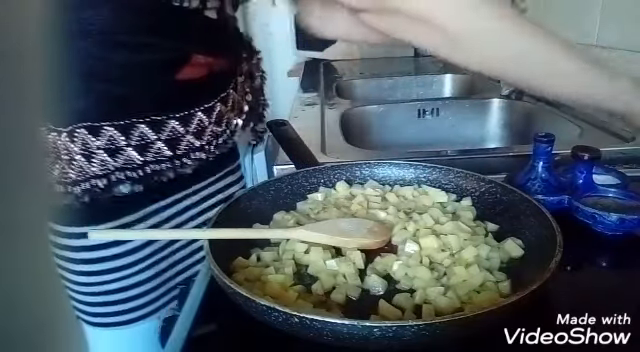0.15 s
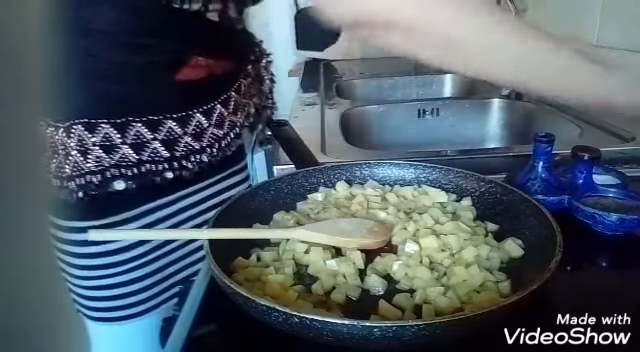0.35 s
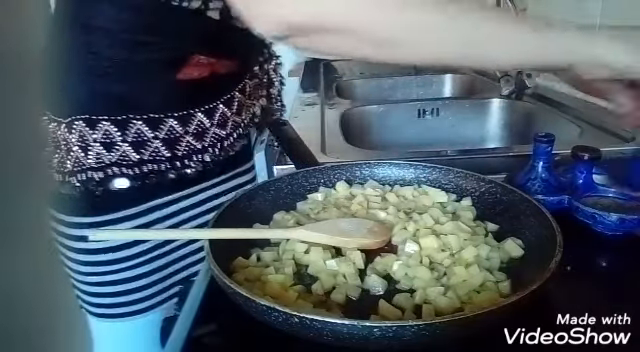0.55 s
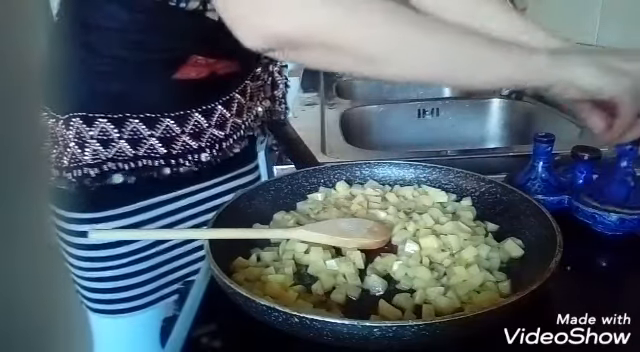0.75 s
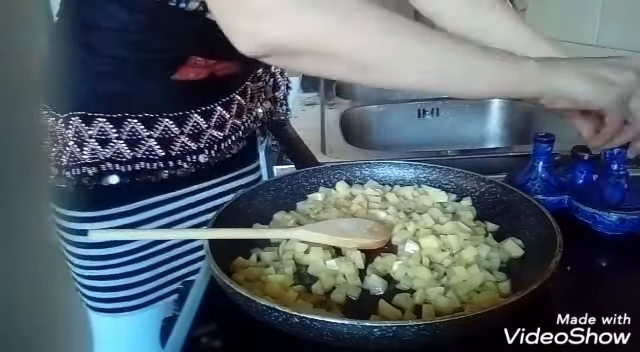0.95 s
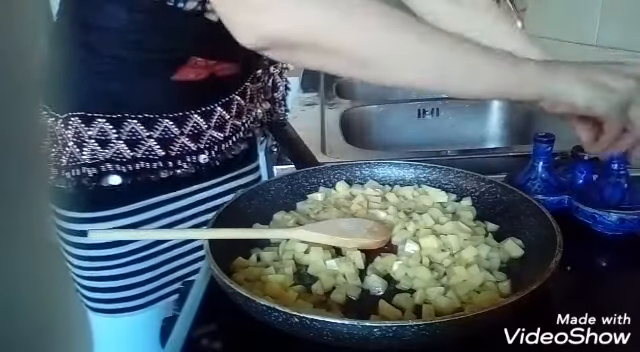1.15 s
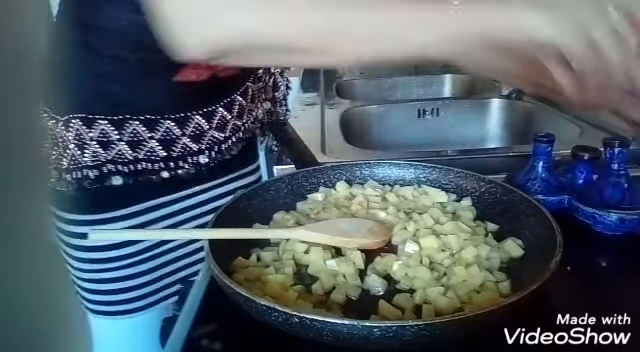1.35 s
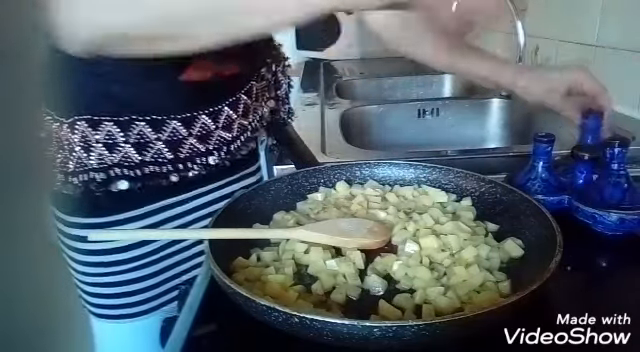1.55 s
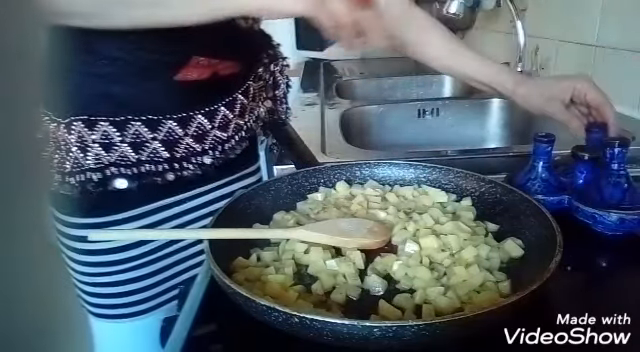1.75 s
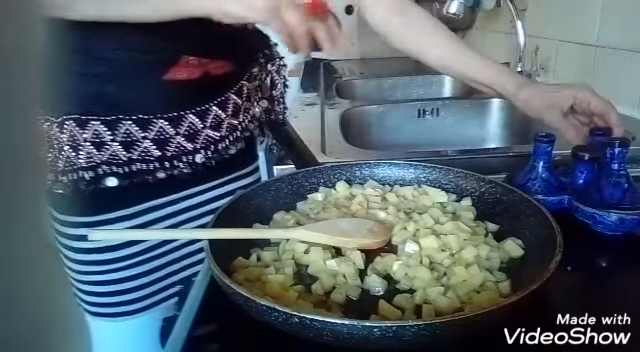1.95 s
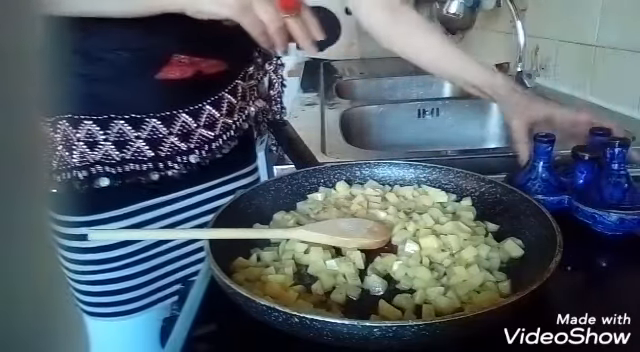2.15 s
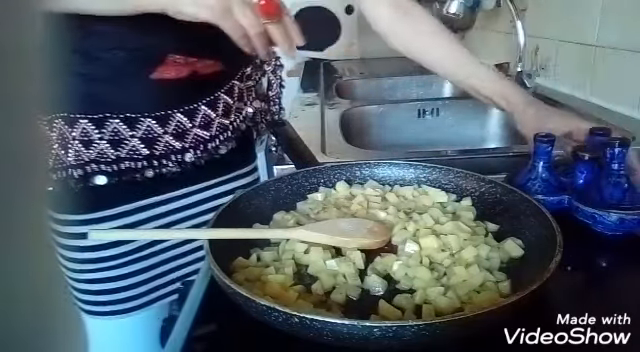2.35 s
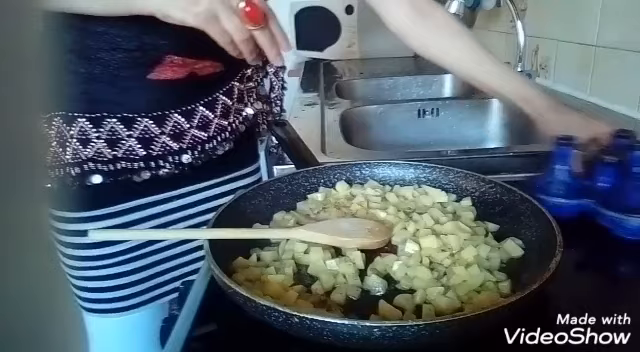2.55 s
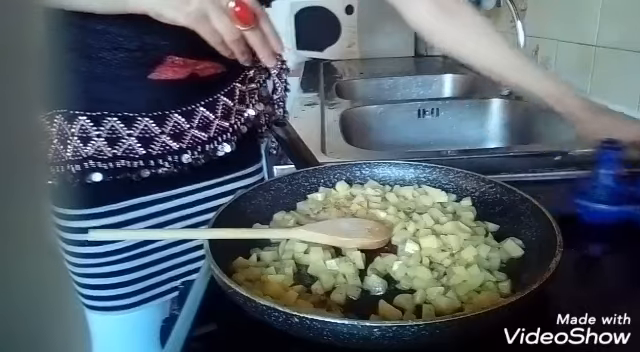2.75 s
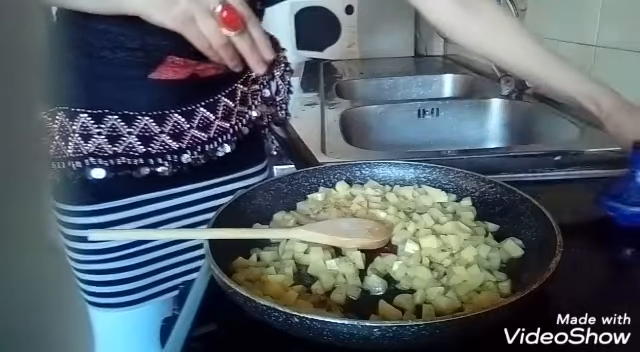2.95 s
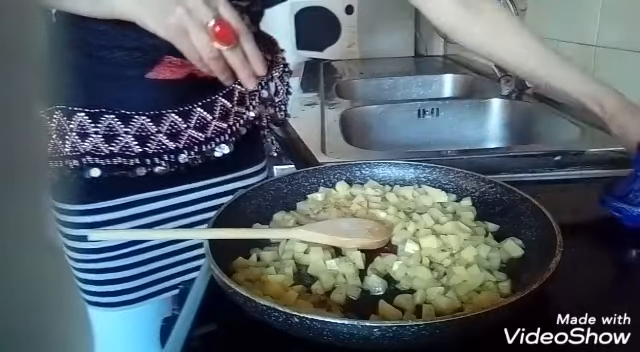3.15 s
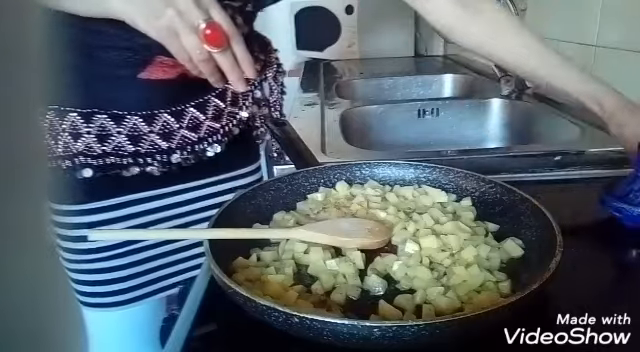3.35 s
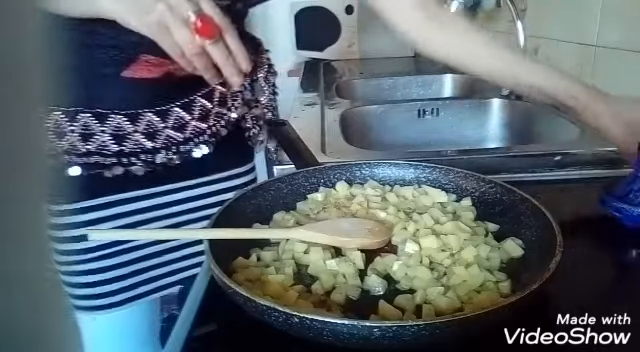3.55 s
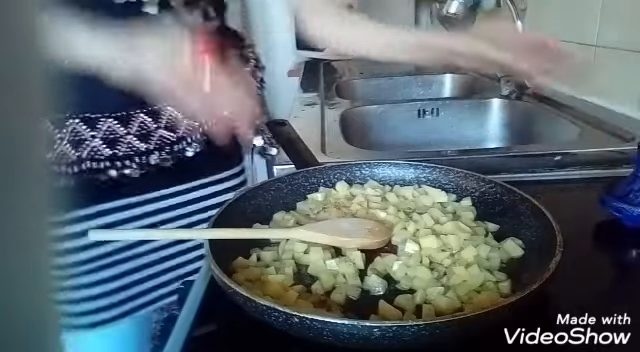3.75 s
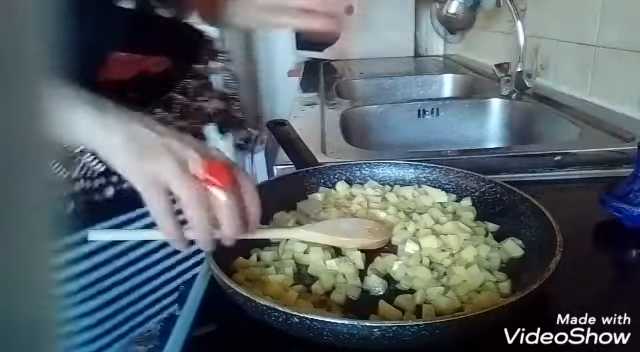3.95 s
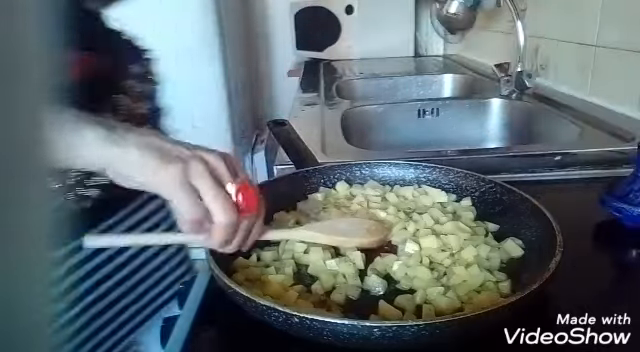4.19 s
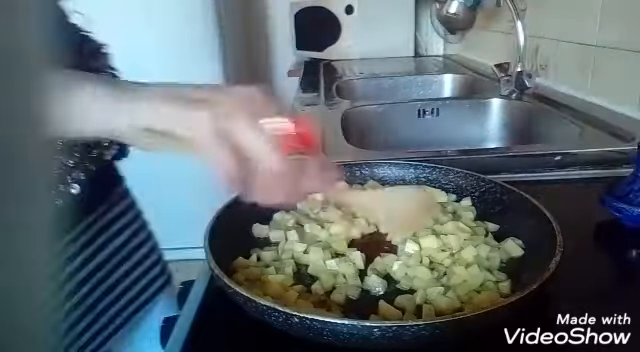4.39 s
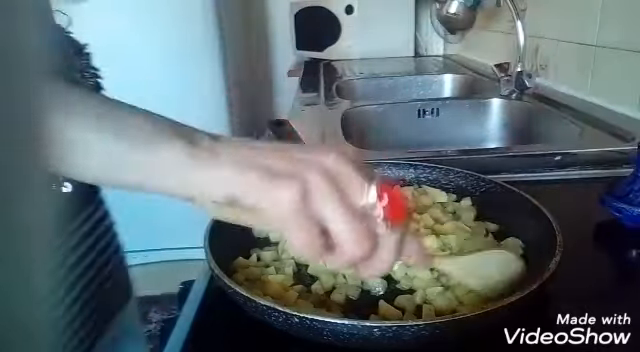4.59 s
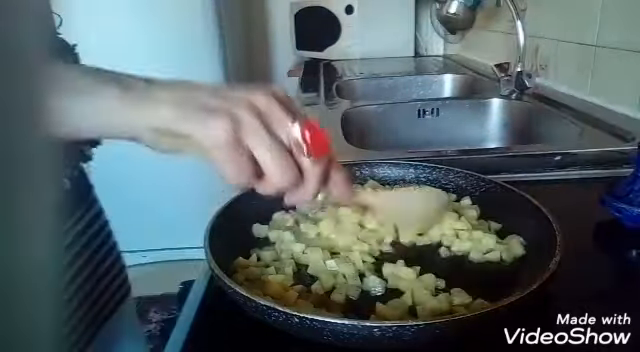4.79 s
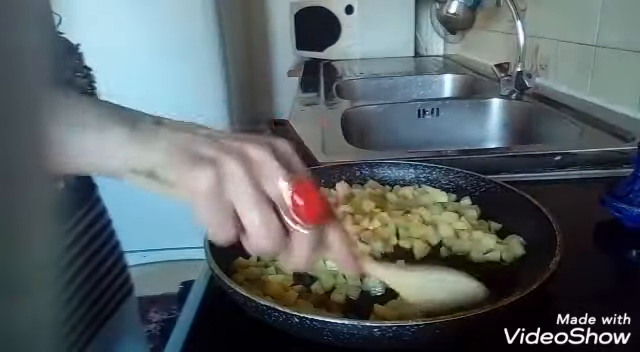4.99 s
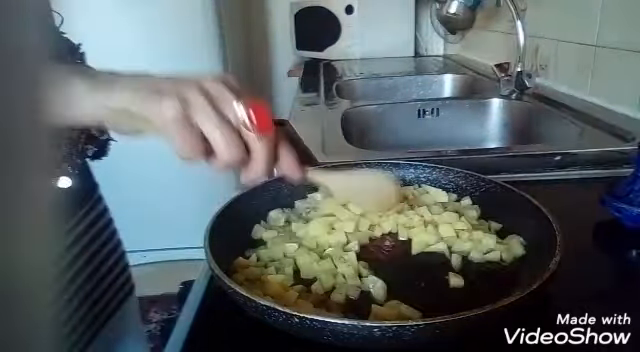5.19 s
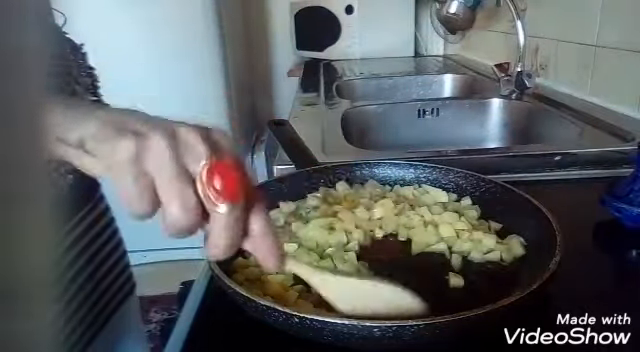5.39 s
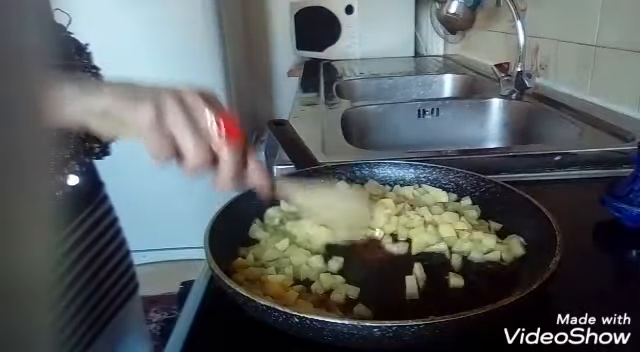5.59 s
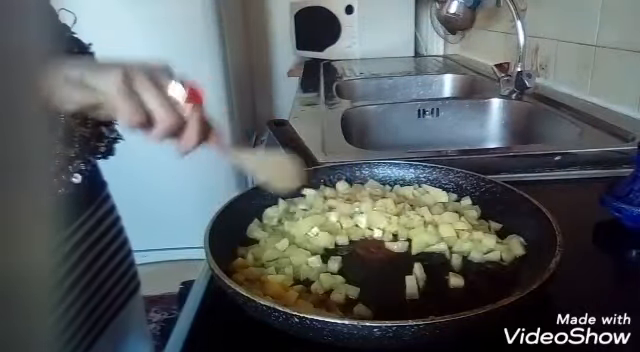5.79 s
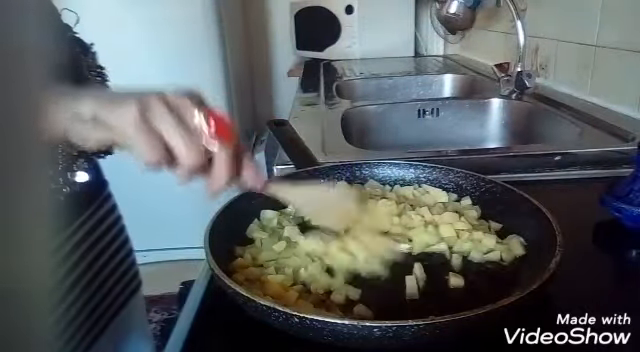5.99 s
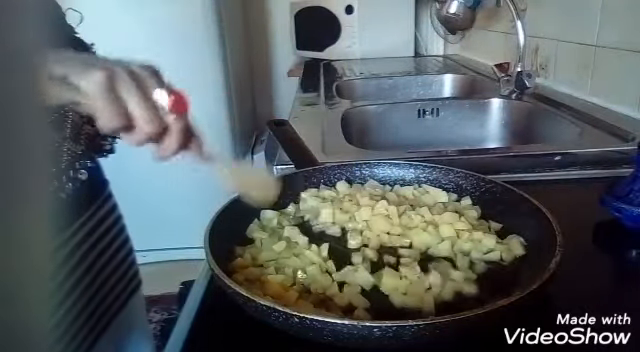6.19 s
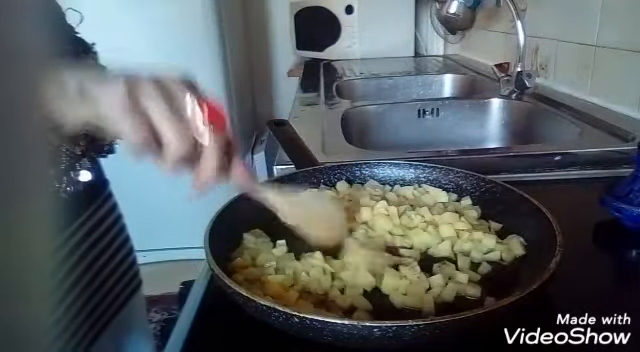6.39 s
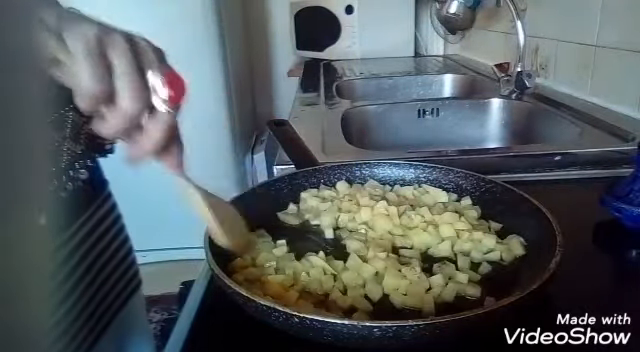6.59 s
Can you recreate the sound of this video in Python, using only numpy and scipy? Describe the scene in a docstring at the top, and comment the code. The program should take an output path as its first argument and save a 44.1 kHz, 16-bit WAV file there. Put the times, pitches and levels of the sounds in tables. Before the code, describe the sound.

Diced potatoes sizzle steadily in oil while glass cruets knock and slide on a worktop, then a wooden spoon taps, scrapes and stirs the pan.

```python
"""An appliance hums low and diced potatoes sizzle in oil: mains tone, noise bands, random bubble bursts.
Drops of water crackle; glass cruets are knocked (clicks into resonances) and slid (tiny slips).
A wooden spoon then knocks, scrapes and stirs the pan, and the sizzle flares as wet faces meet the oil."""
import sys
import numpy as np
from scipy import signal
from scipy.fft import rfft, irfft, next_fast_len
from scipy.io import wavfile
from scipy.ndimage import uniform_filter1d

SR = 44100
rng = np.random.default_rng(int(sys.argv[2]) if len(sys.argv) > 2 else 0)


def transcribe(signal):
    """Save signal, clipped to [-1, 1], as a 16-bit WAV file at the path in sys.argv[1]."""
    frames = np.atleast_2d(signal).T
    limited = np.clip(frames, -1, 1)
    pcm = np.round(limited * 32767).astype(np.int16)
    wavfile.write(sys.argv[1], SR, pcm)


N = 292363
TIME = np.arange(N) / SR


def from_db(db):
    """Decibels to gain."""
    return 10 ** (np.asarray(db) / 20)


def rms_one(x):
    """Scale to unit rms."""
    return x / np.sqrt(np.mean(x ** 2) + 1e-20)


def at_hz(points, hz):
    """Read a table on a log-frequency axis."""
    freqs, values = np.transpose(points)
    return np.interp(np.log(np.maximum(hz, 1)), np.log(freqs), values)


def colour(x, spectrum):
    """Filter by a table of (frequency [Hz], gain [dB])."""
    size = next_fast_len(N + SR // 10)
    gain = from_db(at_hz(spectrum, np.fft.rfftfreq(size, 1 / SR)))
    return irfft(rfft(x, size) * gain, size)[:N]


def cut(x, hz, kind, order=2):
    """Butterworth filter."""
    return signal.sosfilt(signal.butter(order, hz, kind, fs=SR, output="sos"), x)


def resonate(x, modes):
    """Parallel resonances (frequency [Hz], width [Hz], gain [dB]), all starting in step."""
    out = 0
    for hz, width_hz, db in modes:
        r = np.exp(-np.pi * width_hz / SR)
        poles = [1, -2 * r * np.cos(2 * np.pi * hz / SR), r * r]
        mode = signal.lfilter([1, 0, -1], poles, x + 1e-18)
        out = out + from_db(db) * (1 - r * r) / 2 * mode
    return out


def grains(per_s, spread_db):
    """Random clicks of either sign, many small and a few large; rms 1."""
    sizes = from_db(spread_db * np.minimum(rng.exponential(1, N), 5))
    signs = rng.choice([-1, 1], N)
    return rms_one(sizes * signs * (rng.random(N) < per_s / SR))


def swell(start_s, length_s, attack_s, release_t60_s):
    """Gain that rises, holds until the length is over and dies away."""
    t = TIME - start_s
    return np.clip(t / attack_s, 0, 1) * from_db(-60 * np.maximum(t - length_s, 0) / release_t60_s)


# appliance rumble colour: (frequency [Hz], density [dB per Hz])
RUMBLE_COLOUR = [(22, -16), (44, -15.5), (63, -14), (84, -4), (118, -0.5), (165, -4), (198, -8.5),
                 (252, -9.5), (305, -19.5), (520, -15), (1100, -48)]


def appliance(mains_hz, mains_db, drone_hz, drone_width_hz, drone_db, rumble_db):
    """A steady mains line and a wavering fan drone (narrow noise) over low rumble."""
    mains = rms_one(np.sin(2 * np.pi * mains_hz * TIME))
    drone_band_hz = [drone_hz - drone_width_hz / 2, drone_hz + drone_width_hz / 2]
    # the first second lets the narrow filter settle
    drone = rms_one(cut(rng.standard_normal(N + SR), drone_band_hz, "band")[SR:])
    rumble = rms_one(colour(rng.standard_normal(N), RUMBLE_COLOUR))
    return from_db(mains_db) * mains + from_db(drone_db) * drone + from_db(rumble_db) * rumble


# stirring strokes push the cubes and turn wet faces into the oil:
# (start [s], length [s], rustle of the cubes [dB], flare of the sizzle [dB])
STIR_STROKES = [(4.82, 0.42, -67, -44.5), (5.247, 0.073, -58.5, -40), (5.385, .18, -71, -45),
                (5.57, .36, -70, -41.5), (5.966, .25, -73, -40), (6.376, 0.17, -69, -44)]
SIMMER_DB, FLARE_ATTACK_S, FLARE_T60_S = -45, 0.06, 0.78
WAVER_DB, WAVERS_PER_S = 0.76, 14


def frying():
    """Frying strength: powers of a simmer and a flare per stroke add, wavering a little at random."""
    flare_power = 0
    for start_s, length_s, _, flare_db in STIR_STROKES:
        flare = from_db(flare_db) * swell(start_s, length_s, FLARE_ATTACK_S, FLARE_T60_S)
        flare_power = flare_power + flare ** 2
    waver = np.interp(TIME * WAVERS_PER_S, np.arange(SR), rng.standard_normal(SR))
    return np.sqrt(from_db(SIMMER_DB) ** 2 + flare_power) * from_db(WAVER_DB * waver)


# colour of the bursting steam bubbles: (frequency [Hz], density [dB per Hz])
BUBBLE_COLOUR = [(160, -19), (310, -6.5), (440, -7), (570, -2.5), (740, -1), (940, -3.5), (1180, -3.5),
                 (1390, -1), (1600, -3), (1810, -2.5), (2100, -5), (2740, -3.5), (3350, -5), (4700, -6.5),
                 (9000, -6), (15000, -5)]


def sizzle(bubbles_per_s, spread_db, spits_per_s, spit_db, brightening):
    """Countless steam bubbles burst in the oil; harder frying makes more of them, and finer ones."""
    heat = frying()
    vigour = rms_one(heat)
    # undo the level rise due to density alone; heat sets the level
    bursts = grains(bubbles_per_s * vigour, spread_db) / np.sqrt(vigour)
    spits = from_db(spit_db) * cut(grains(spits_per_s * vigour, spread_db=6), 8500, "high", order=3)
    fizz = rms_one(colour(bursts + spits, BUBBLE_COLOUR))
    fine = colour(fizz, [(1800, -62), (3400, 3), (6500, 4), (9000, -22)])
    return heat * (fizz - fine + fine * vigour ** brightening)


# drops of water bursting in the oil, singly or in a spatter: (time [s], level [dB], t60 [s])
WATER_DROPS = [(.077, -36, 0.0065), (1.377, -37, .007), (4.255, -34, .007), (4.885, -42, .1),
               (6.051, -29, .007), (6.099, -29, 0.14)]


def drops(pops_per_s, spread_db):
    """Each drop goes off as a short, bright crackle of steam."""
    puffs = 0
    for start_s, db, t60_s in WATER_DROPS:
        decay = from_db(-60 * np.maximum(TIME - start_s, 0) / t60_s)
        puffs = puffs + from_db(db) * (TIME >= start_s) * decay
    return cut(puffs * grains(pops_per_s, spread_db), 6500, "high", order=3)


def contact(body, contact_hz, rattle_db, rattle_t60_s):
    """A click and a dying rattle into the body, dulled by a soft contact; rms 1."""
    t = TIME[:SR // 3]
    rattle = from_db(rattle_db - 60 * t / rattle_t60_s) * rng.standard_normal(len(t))
    return rms_one(cut(resonate((t == 0) + rattle, body), contact_hz, "low", order=6))


# at ordinary strength a blow settles after SETTLE_S; firmer blows settle sooner and rattle less
ORDINARY_DB, SETTLE_S, FIRMNESS = -34, 0.0072, 0.6
# low cut as a share of the struck spot's pitch
LOW_CUT_SHARE = 0.5


def blows(rows, body, rattle_db, touch_t60_s, settle_t60_s, ring_t60_s):
    """Each blow lands on an edge, settles flat with a longer rattle, and rings at the struck spot's pitch."""
    out, t = np.zeros(N + SR), TIME[:SR // 3]
    for start_s, db, settle_db, contact_hz, pitch_hz, ring_db in rows:
        looseness = from_db(FIRMNESS * (ORDINARY_DB - db))
        touch = contact(body, contact_hz, rattle_db, touch_t60_s * looseness)
        settle = contact(body, contact_hz, rattle_db, settle_t60_s * looseness)
        settle = np.pad(settle, (round(SETTLE_S * looseness * SR), 0))[:len(t)]
        low_cut_hz = LOW_CUT_SHARE * pitch_hz
        thud = cut(touch + from_db(settle_db) * settle, low_cut_hz, "high", order=3)
        tone = np.sin(2 * np.pi * pitch_hz * t) * from_db(-60 * t / ring_t60_s)
        ring = cut(tone, low_cut_hz, "high")
        blow = rms_one(thud) + from_db(ring_db) * rms_one(ring)
        # level = whole energy of the blow packed into 10 ms
        blow = blow / np.linalg.norm(blow) * np.sqrt(SR / 100)
        start = round(start_s * SR)
        out[start:start + len(t)] += from_db(db) * blow
    return out[:N]


# glass cruets knocked on the worktop: (time [s], level [dB], settling re first touch [dB],
# contact cut-off [Hz], pitch of the struck spot [Hz], ring re thud [dB])
CRUET_KNOCKS = [(.2470, -38.5, 0, 2080, 865, 8), (.2525, -37.5, 0, 2490, 1080, -13),
                (.2580, -37.5, -23, 1880, 855, -1.5), (.4484, -41.5, -16, 1700, 515, 1),
                (.4574, -35.5, -1, 2900, 920, -19), (.4908, -42, -15, 1900, 450, -12),
                (.9766, -23.5, -15, 3070, 501, -11.5), (1.1124, -36.5, -6, 690, 312, -8),
                (1.8594, -32, -15, 1980, 1130, -16), (1.9858, -38.5, 3, 720, 197, -7),
                (2.0170, -37.5, -16, 1300, 320, -10), (2.0280, -40.5, -8, 700, 400, 3),
                (2.0450, -43, -8, 700, 387, 1), (2.0578, -39.5, -15, 1410, 504, -15),
                (2.0680, -42.5, -2, 800, 236, -9), (2.2214, -47, -22, 934, 720, 3),
                (2.9860, -39, 2, 1880, 240, -7), (3.0026, -34.5, -9, 3360, 327, -9),
                (3.0248, -38.5, 6, 1110, 167, 2), (3.0300, -42, -3, 2800, 302, -3)]
# worktop resonances: (frequency [Hz], width [Hz], gain [dB])
WORKTOP_MODES = [(127, 28, 18), (220, 43, 11), (340, 49, 14), (442, 140, 4.5), (670, 240, 6.5),
                 (850, 130, 6), (1080, 100, -12), (1444, 55, 4.5), (1730, 86, 2.5), (1850, 52, -16),
                 (2270, 90, -6), (2560, 67, -6), (4000, 580, 1)]


def cruet_knocks():
    """Cruets touch and settle on the worktop, exciting its resonances."""
    return blows(CRUET_KNOCKS, WORKTOP_MODES, rattle_db=-24.0,
                 touch_t60_s=0.042, settle_t60_s=0.12, ring_t60_s=0.077)


def rings(rows):
    """Clean dying tones (time [s], pitch [Hz], peak [dB], t60 [s]) without deep bass."""
    out, t = np.zeros(N + SR), TIME[:SR // 2]
    for start_s, hz, db, t60_s in rows:
        start = round(start_s * SR)
        out[start:start + len(t)] += from_db(db - 60 * t / t60_s) * np.sin(2 * np.pi * hz * t)
    return cut(out[:N], 85, "high", order=3)


# short dying tones of the worktop knocks, low and high: (time [s], pitch [Hz], peak [dB], t60 [s])
KNOCK_TONES = [(.258, 863, -42, 0.3), (.4574, 1290, -35, .035), (.977, 1700, -36.5, 0.21),
               (.977, 4970, -41, 0.039), (1.860, 1634, -28, 0.034), (1.860, 740, -33, 0.037),
               (2.017, 1730, -38, 0.044), (2.017, 717, -34, .04), (2.022, 405, -42, 0.14),
               (2.058, 707, -35, 0.064)]


def knock_tones():
    """Short decaying sines, low and high, accompany some worktop knocks."""
    return rings(KNOCK_TONES)


# booming worktop panel: (time [s], pitch [Hz], peak [dB], t60 [s])
PANEL_BOOMS = [(1.1124, 134, -37.5, .06), (1.860, 140, -34, 0.065), (2.017, 134, -37, 0.066),
               (3.003, 150, -29, 0.11)]


def panel_booms():
    """The worktop's panel booms under some knocks in low decaying sines."""
    return rings(PANEL_BOOMS)


def rub(pressure, body, slips_per_s, spread_db, soft_hz):
    """Friction: a stream of tiny slips excites the body as hard as it is pressed."""
    slips = resonate(grains(slips_per_s, spread_db), body)
    return pressure * rms_one(cut(slips, soft_hz, "low"))


# force dragging, then shoving the cruet stand along the worktop: (time [s], level [dB])
SLIDE_FORCE = [(2.6, -81), (2.75, -52.5), (2.85, -50), (2.93, -53.5), (2.965, -45), (2.99, -40.5),
               (3.035, -43.5), (3.07, -50), (3.2, -83)]
# resonances of the sliding stand: (frequency [Hz], width [Hz], gain [dB])
STAND_MODES = [(268, 420, 3), (636, 350, 4.5), (980, 240, 6.5), (1260, 180, -9), (1740, 230, -11),
               (2510, 480, -28), (3600, 820, -34)]


def stand_slide():
    """Friction of the cruet stand on the worktop, following the dragging force."""
    force = from_db(np.interp(TIME, *np.transpose(SLIDE_FORCE)))
    return rub(force, STAND_MODES, slips_per_s=4600, spread_db=4.0, soft_hz=3550)


# spoon blows on the pan: (time [s], level [dB], settling re first touch [dB],
# contact cut-off [Hz], pitch of the struck spot [Hz], ring re thud [dB])
SPOON_TAPS = [(4.1160, -39.5, -2, 700, 406, 10), (4.1232, -35.5, 0, 1350, 559, 2),
              (4.7895, -42.5, -6, 450, 147, 0), (4.8185, -41, -11, 850, 252, 2),
              (5.1458, -36.5, -10, 850, 179, -22), (5.1503, -35.5, -1, 850, 120, -1.5),
              (5.2134, -39, 1, 503, 150, 1), (5.2905, -45, -10, 1710, 1010, -2),
              (5.5749, -29, -13, 3280, 344, -2), (5.5805, -34, -19, 3000, 700, -5),
              (5.6020, -40.5, -6, 900, 337, 0), (5.6290, -42, -12, 900, 146, 4),
              (5.6440, -39, -9, 810, 210, -7), (6.4975, -44.5, -8, 1850, 473, -8)]
# pan resonances: (frequency [Hz], width [Hz], gain [dB])
PAN_MODES = [(125, 113, 8.5), (252.5, 13, 13), (349.4, 20, 9), (403, 81, -9), (530, 170, 1.5),
             (700, 150, 4.5), (1010, 400, -4.5), (1310, 56, -5), (1840, 160, 4.5), (2340, 120, 0),
             (2700, 89, -23), (3360, 210, -28)]


def spoon_taps():
    """The wooden spoon strikes the pan, exciting its resonances."""
    return blows(SPOON_TAPS, PAN_MODES, rattle_db=-11.5,
                 touch_t60_s=0.015, settle_t60_s=0.16, ring_t60_s=0.087)


def presses(strokes, attack_s, release_t60_s):
    """Pressure of strokes (start [s], length [s], level [dB])."""
    return sum(from_db(db) * swell(start_s, length_s, attack_s, release_t60_s)
               for start_s, length_s, db in strokes)


# the spoon's edge rasping across the pan: (start [s], length [s], level [dB])
SPOON_SCRAPE = [(4.661, 0.051, -43)]
# resonances of the pressed spoon: (frequency [Hz], width [Hz], gain [dB])
SPOON_MODES = [(250, 55, 4), (420, 90, -3), (564, 60, 2), (810, 90, 5), (1230, 120, -5)]


def spoon_scrape():
    """Friction of the spoon's edge on the pan, heard through the spoon's resonances."""
    pressure = presses(SPOON_SCRAPE, attack_s=0.0055, release_t60_s=0.12)
    return rub(pressure, SPOON_MODES, slips_per_s=2600, spread_db=1.0, soft_hz=1500)


# course of the dragged spoon's judder: (time [s], pitch [Hz], peak of a slip [dB])
JUDDER_COURSE = [(4.662, 667, -35), (4.673, 705, -28.5), (4.70, 663, -31), (4.722, 585, -33),
                 (4.732, 750, -43), (4.752, 800, -36), (4.768, 750, -52)]


def spoon_judder(slip_gap_s, unevenness, ring_t60_s, octave_db):
    """Wood sticks and slips almost regularly; each slip rings the spoon's note and its octave."""
    course_s, course_hz, course_db = np.transpose(JUDDER_COURSE)
    gaps_s = slip_gap_s * (1 + unevenness * rng.uniform(-1, 1, size=20))
    slip_times_s = course_s[0] + np.cumsum(gaps_s) - gaps_s[0]
    notes, octaves = [], []
    for t in slip_times_s[slip_times_s < course_s[-1]]:
        hz, db = np.interp(t, course_s, course_hz), np.interp(t, course_s, course_db)
        notes.append((t, hz, db, ring_t60_s))
        octaves.append((t, 2 * hz, db + octave_db, ring_t60_s / 2))
    return rings(notes) + rings(octaves)


def cube_rustle():
    """Stirring strokes push the cubes, whose friction excites the pan."""
    strokes = [(start_s, length_s, db) for start_s, length_s, db, _ in STIR_STROKES]
    pressure = presses(strokes, attack_s=0.017, release_t60_s=0.54)
    return rub(pressure, PAN_MODES, slips_per_s=1100, spread_db=3.0, soft_hz=2010)


# ringing pan: (time [s], pitch [Hz], peak [dB], t60 [s])
PAN_RINGS = [(5.149, 673, -40, .12), (5.8, 390, -46, 0.23), (5.576, 2018, -32.5, 0.2),
             (4.9, 2400, -32, .025), (5.578, 660, -29.5, 0.12), (5.576, 330, -37, 0.17)]


def pan_rings():
    """The pan rings on in decaying sines."""
    return rings(PAN_RINGS)


# kitchen reverberation: (frequency [Hz], t60 [s])
KITCHEN_T60 = [(110, 0.49), (520, 0.41), (1650, 0.43), (4800, 0.04)]


def kitchen(x, gap_s):
    """Dense reflections from tiled walls, dying band by band, with no overall colour."""
    t, response = TIME[:SR * 2 // 3], 0
    edges_hz = 60 * 2. ** np.arange(9)
    for low_hz, high_hz in zip(edges_hz, edges_hz[1:]):
        band = cut(rng.standard_normal(len(t)), [low_hz, high_hz], "band")
        t60_s = at_hz(KITCHEN_T60, np.sqrt(low_hz * high_hz))
        response = response + band * np.exp(-np.log(1000) * t / t60_s)
    # gradual build-up of reflections
    response = response * (1 - np.exp(-(t / gap_s) ** 2))
    # even out the random response's colour, so the echo is neutral
    spectrum = rfft(response, SR)
    power = uniform_filter1d(np.abs(spectrum) ** 2, size=90)
    response = irfft(spectrum / np.sqrt(power + 1e-9), SR)[:len(t)]
    return signal.fftconvolve(x, response)[:N]


def scene():
    """Worktop and spoon sounds also reach the kitchen reverberation; the other sources stay dry."""
    hum = appliance(mains_hz=100, mains_db=-63, drone_hz=144.7, drone_width_hz=12,
                    drone_db=-54, rumble_db=-56.5)
    oil = sizzle(bubbles_per_s=11000, spread_db=2.0, spits_per_s=72, spit_db=-15, brightening=0.095)
    oil = oil + drops(pops_per_s=5500, spread_db=4.5)
    worktop = cruet_knocks() + knock_tones() + panel_booms() + stand_slide()
    judder = spoon_judder(slip_gap_s=0.0083, unevenness=0.12, ring_t60_s=0.036, octave_db=-19)
    spoon = spoon_taps() + spoon_scrape() + judder + cube_rustle()
    room = kitchen(from_db(-6.5) * worktop + from_db(-6.0) * spoon, gap_s=0.013)
    return (hum + oil + worktop + spoon + pan_rings() + room)[None]


# microphone colour, dull with a narrow lift near the top: (frequency [Hz], gain [dB])
MICROPHONE_COLOUR = [(4900, 0), (5600, -5.5), (6500, -12), (7300, -18), (8200, -23.5), (10000, -26),
                     (11800, -26.5), (13800, -30), (14650, -18.5), (15400, -21)]
CUTOFF_HZ = 15550


def record(dry):
    """A small microphone dulls the treble; the top is cut steeply."""
    low_pass = signal.ellip(12, 0.1, 80, CUTOFF_HZ, fs=SR, output="sos")
    return signal.sosfilt(low_pass, colour(dry[0], MICROPHONE_COLOUR))[None]


dry = scene()
out = record(dry)
transcribe(out)
```